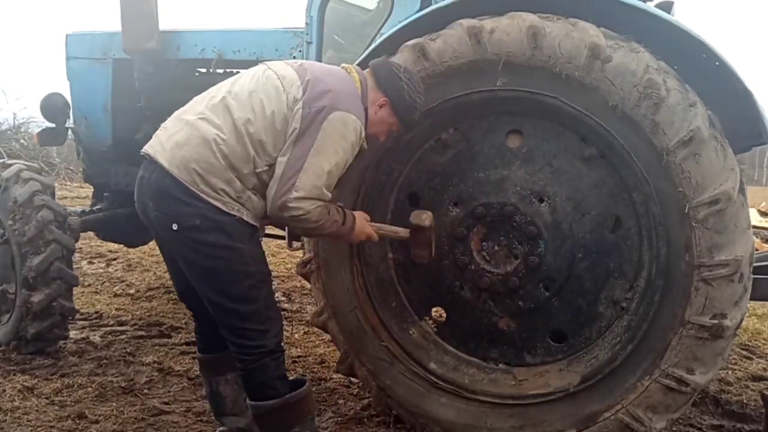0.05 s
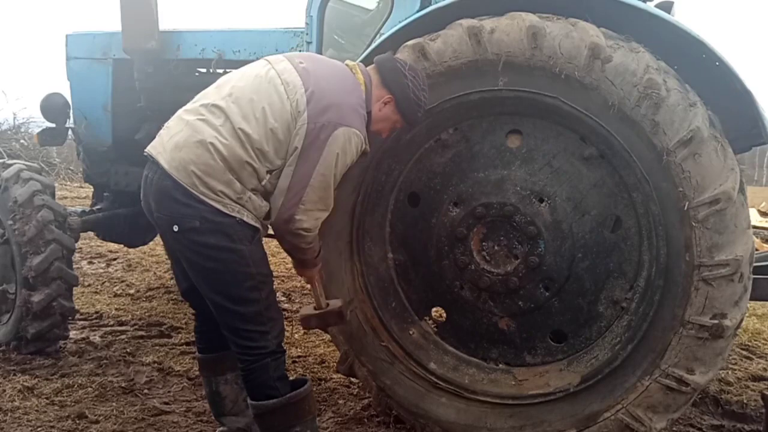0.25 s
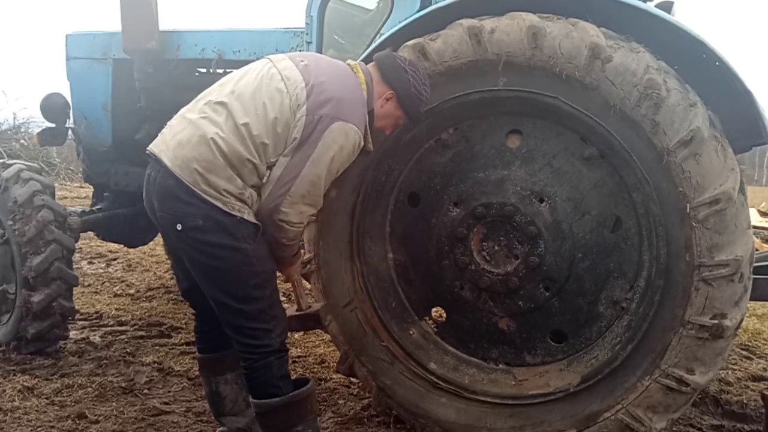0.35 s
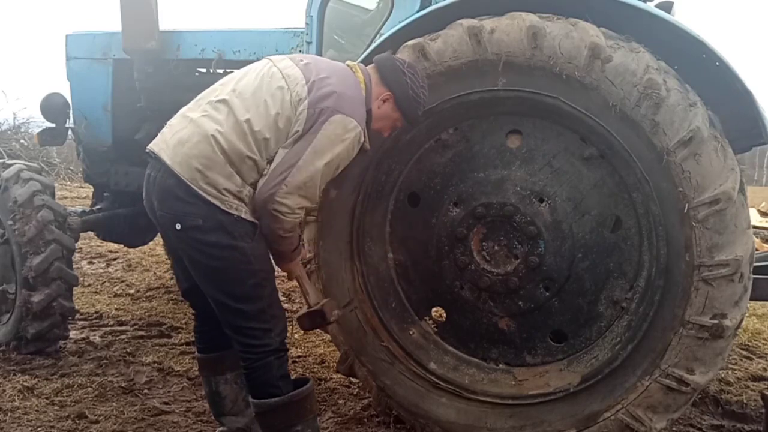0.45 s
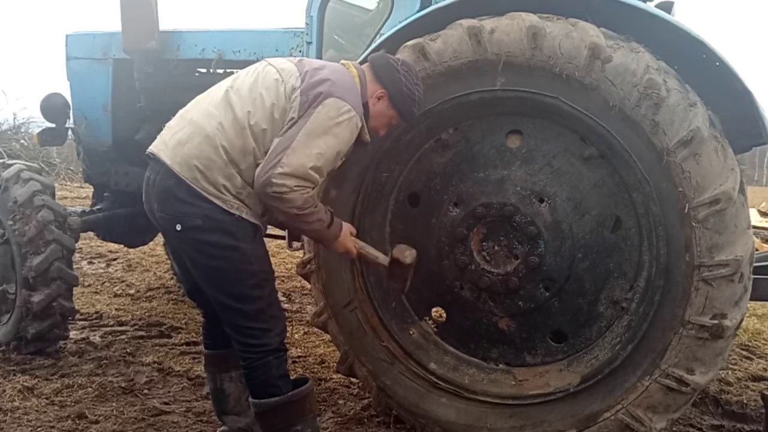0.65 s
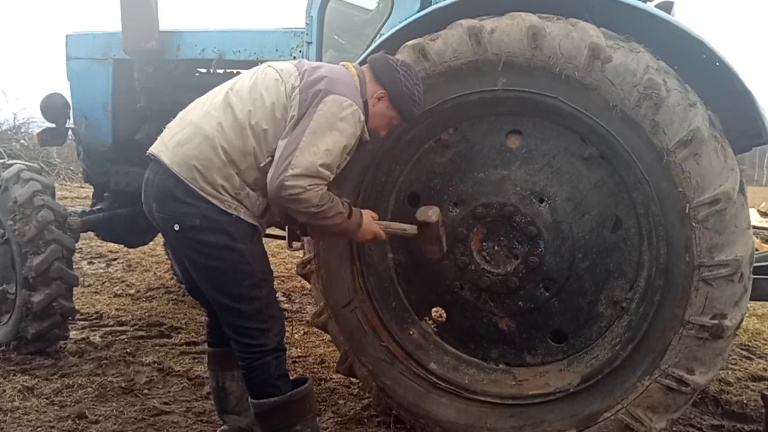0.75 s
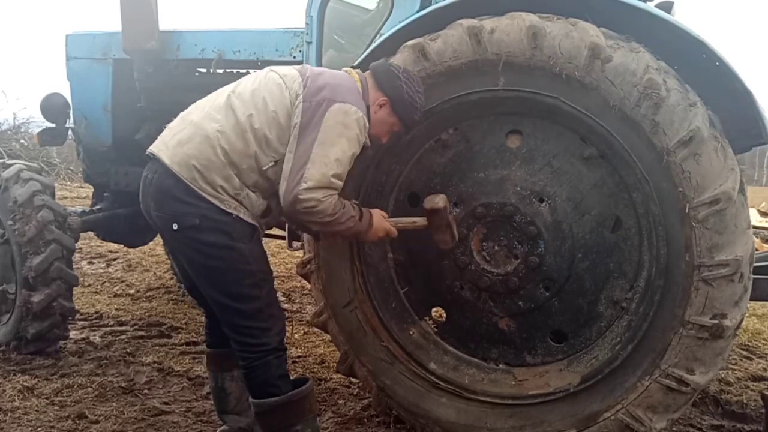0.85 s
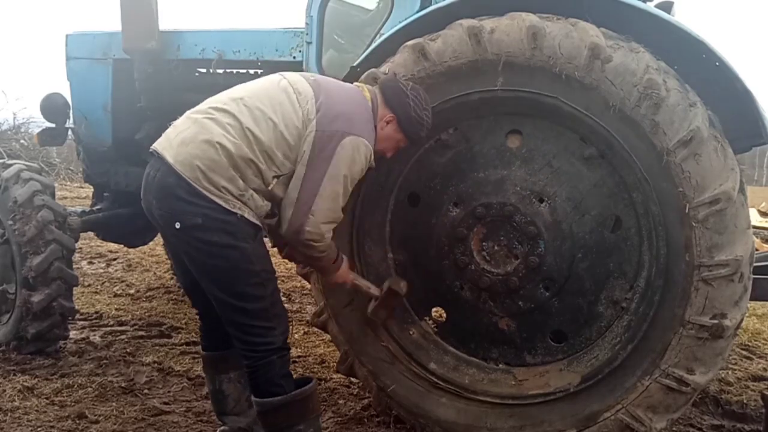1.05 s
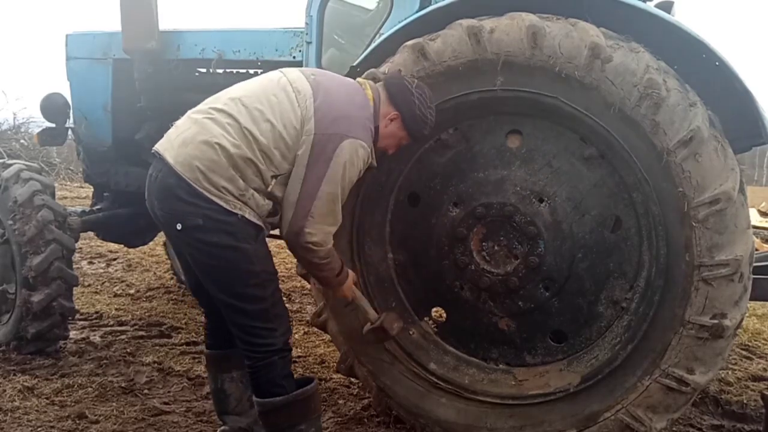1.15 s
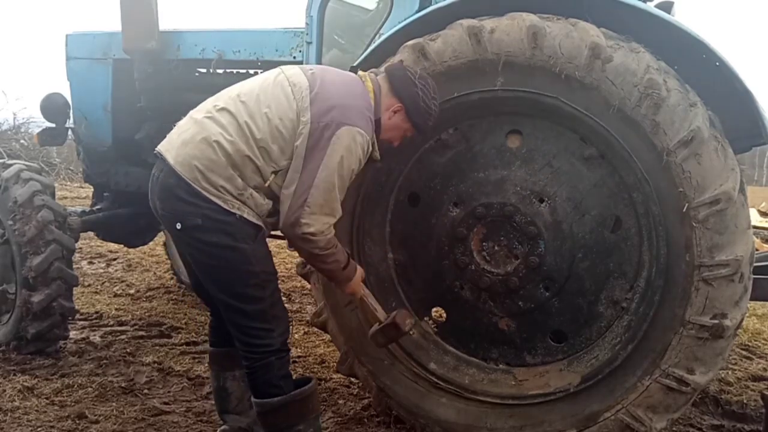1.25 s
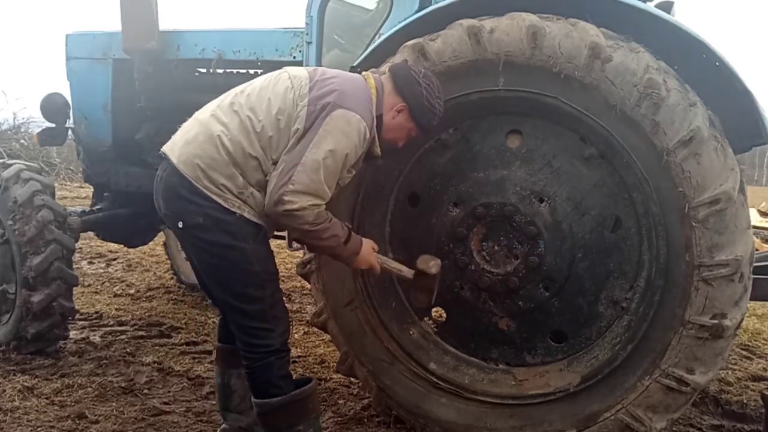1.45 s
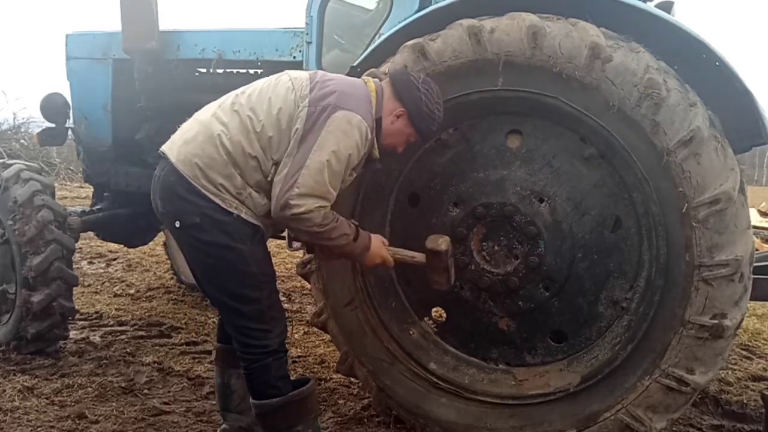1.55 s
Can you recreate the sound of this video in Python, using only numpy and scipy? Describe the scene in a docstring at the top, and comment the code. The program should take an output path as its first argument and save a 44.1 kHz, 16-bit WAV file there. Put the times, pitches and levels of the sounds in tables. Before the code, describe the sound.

Hammer blows on a large tractor wheel, heard close in an open yard. After faint rustle and a tiny tap, a loud, blunt, overloaded rubber thud lands at 0.2 seconds with a little grit. Low wind buffets flutter from about 0.4 to 1.1 seconds over soft cloth and straw rustle. At 1.1 the hammer grazes rubber and cracks on steel, a bright short clang with a thin high ring and scattered echoes fading out.

```python
"""A hammer is swung twice at the edge of a tractor wheel in an open yard: first it lands on the tyre,
then it grazes the tyre and hits the steel rim. Tyre and rim are sums of dying sines, with noise for
grit, crack and wash. The hammer head sings on as a thin sine, and echoes come back from the yard as noise
and a tone. Wind buffets both microphone ports with low noise, short sine pushes and sharp crests.
Clothing and straw rustle with the swing as patchy hiss, and there is one light tap."""
import sys
import numpy as np
from scipy import signal
from scipy.io import wavfile

SR = 44100
rng = np.random.default_rng(int(sys.argv[2]) if len(sys.argv) > 2 else 0)


def attenuation_scalar(level_db):
    """Turn a level in dB into a linear amplitude multiplier (20 dB per decade)."""
    decades = np.asarray(level_db, float) / 20
    return 10 ** decades


def file_out(sig):
    """Save sig as 16-bit WAV at sys.argv[1]."""
    # one column per channel
    cols = np.atleast_2d(sig).T
    # limit, then scale
    lim = np.clip(cols, -1, 1)
    pcm = np.round(lim * 32767).astype(np.int16)
    wavfile.write(sys.argv[1], SR, pcm)


N = 70560
T = np.arange(N) / SR  # time of every sample, s

# In all tables, t60_s is the time to die away by 60 dB and pan_db is left minus right.
# wind at the ports, points of a curve; WIND_DB is added to the level: time_s, level_db, pan_db
WIND_LEVELS = [
    [(0.0, -21.5, 6), (0.036, -39, 12), (0.062, -34, -14.5), (0.102, -31.5, 2), (0.14, -29.5, -4),
     (0.174, -26, 8), (0.206, -26, 5), (0.226, -14.5, -20)],
    [(0.33, -22.5, 0.5), (0.48, -23.5, 10.5), (0.564, -29.5, -23), (0.646, -33, 41), (0.676, -14.5, -15),
     (0.784, -13, 11), (1.036, -25, -6), (1.074, -20.5, 37.5), (1.095, -28, -13)],
    [(1.3, -31.5, -32.5), (1.33, -23.5, 8), (1.372, -20, -3), (1.414, -38.5, 26), (1.464, -46, 10),
     (1.534, -42, -17), (1.548, -26, -4), (1.576, -35, 15.5), (1.6, -38, 21)],
]
# tone colour of the wind noise: pitch_hz, density_db (per Hz)
WIND_SPECTRUM = [(12, -55), (20, -57.5), (54, 6.5), (107, 1), (280, -21.5), (401, -63), (615, -66),
                 (743, -61), (1030, -59), (1200, -72), (1560, -105), (2640, -120)]
# single buffets: start_s, level_db, pitch_hz, pan_db
WIND_BUFFETS = [(0.108, -26, 102, 23.5), (0.39, -9, 144, -11.5), (0.435, -23, 96.9, 26),
                (0.453, -16.5, 102, 32.5), (0.519, -14.5, 100, 12), (0.639, -11, 91.4, -14),
                (0.674, -9.5, 172, -19.5), (0.701, -9, 105, 15), (0.733, -1, 91, 9.5),
                (0.749, -6, 77.4, -11), (0.791, -7, 109, 23), (0.827, -9, 100, 20),
                (0.893, -14, 167, -20.5), (0.943, -7, 98, 11), (1.025, -18, 123, -17),
                (1.058, -5.5, 99, 18), (1.329, -25, 109, -44.5), (1.415, -23.5, 119, 13)]
# sharp crests of the wind: centre_s, level_db, pan_db, width_s
WIND_CRESTS = [(0.438, -26.5, 28, 0.0011), (0.519, -31, -30, 0.0012), (0.68, -23, -30, 0.0021),
               (0.707, -20.5, -17, 0.0014), (0.731, -26.5, 14, 0.00065), (0.7395, -13.5, -11, 0.0014),
               (0.755, -19, 18.5, 0.00085), (0.793, -32, 19, 0.00057), (0.804, -29, 29, 0.00098),
               (0.831, -23, 29, 0.0013), (0.964, -35, -15.5, 0.0011), (1.032, -26.5, -21.5, 0.0014),
               (1.0685, -23, 32.5, 0.0011), (1.421, -36.5, 14.5, 0.00083)]
# rustle, points of a curve; RUSTLE_DB is added: time_s, level_db, top_db and low_db (against the level)
RUSTLE_LEVELS = [
    [(0.02, -63, -10.5, -5.5), (0.086, -68.5, -14, -14), (0.108, -62.5, -12, -4.5), (0.136, -64.5, -9, -6),
     (0.164, -58, -11.5, -8.5), (0.195, -50.5, -18.5, -11)],
    [(0.29, -54, -17, 0), (0.432, -49, -11.5, -13.5), (0.51, -44, -11, -12.5), (0.558, -50, -15, -14.5),
     (0.774, -52, -13.5, -8), (0.924, -65.5, -13, -16), (0.982, -68, -10, -11), (1.09, -61, -12, -5)],
    [(1.4, -63.5, -19, -45), (1.444, -66.5, -42, 3), (1.486, -68.5, -8, -0.5), (1.522, -54.5, -24, -18),
     (1.546, -54, -19, -15), (1.564, -69.5, -14, 4), (1.576, -75, -27, -34.5), (1.585, -68, -3, -4)],
]
# tone colour of rustle and grit: pitch_hz, density_db (per Hz)
RUSTLE_SPECTRUM = [(210, -41), (350, -3.5), (613, -2), (742, -7.5), (1320, -15), (1480, -20), (4900, -22.5),
                   (6230, -20.5), (8310, -33), (14800, -29.5), (16000, -47)]
# one light tap: start_s, level_db, pitch_hz, t60_s
LIGHT_TAP = (0.105, -47, 1100, .1)
# hammer lands on rubber: start_s, level_db, brightness_db (for modes that pull first), grit_db
TYRE_HITS = [(0.2162, 1, -5, -21.5), (1.1063, -11, 11.5, -25)]
# tyre modes, against the level of the hit: pitch_hz, level_db, t60_s, push (plain gain, minus pulls first)
TYRE_MODES = [(69.5, -18.5, 0.83, 0.05), (102, -10.5, 0.34, 0.84), (119.16, -14, 0.4, 0.85),
              (223.4, -21, 0.21, 0.89), (340, -31.5, 0.49, 0.6), (165.2, -0.5, 0.057, 0.85),
              (278, -5.5, 0.071, 0.17), (250, -3, 0.017, -1.1), (534.3, -20, 0.13, -1.09),
              (770, -20, 0.056, -1.1), (1120, -11, 0.023, -1.11), (1511, -19, 0.13, -0.46),
              (2055, -49, 0.053, -0.77)]
# level of the hammer head's ring after each blow, points of a curve: time_s, level_db
HEAD_LEVELS = [
    [(0.23, -46), (0.268, -73), (0.342, -63), (0.372, -84), (0.45, -63)],
    [(1.13, -55), (1.148, -48), (1.198, -40.5), (1.212, -53), (1.224, -48.5), (1.25, -36.5), (1.273, -51.5),
     (1.288, -39.5), (1.345, -46), (1.38, -64), (1.405, -53), (1.437, -64.5), (1.458, -52), (1.508, -61),
     (1.536, -83), (1.568, -60.5), (1.6, -74)],
]
# steel touches steel: start_s, level_db
STEEL_TOUCHES = [(1.1133, -8.5), (1.1165, -10), (1.1924, -27.5)]
# rim modes, against the level of the touch: pitch_hz, level_db, t60_s
RIM_MODES = [(470, -18, .4), (505, -15, .3), (540, -4, .06), (593, -7, .2), (620, -7, .07), (678, -24, .3),
             (1048, -9, .08), (1180, -12, .22), (1450, -20, .2), (1690, -38, .9), (1725, -39, .8),
             (1750, -6, .06), (1805, -17, .2), (2417, -17, .09), (2615, -2, .03), (2955, -3, .03),
             (3930, -16, .06), (4195, 1, .033), (4750, -24, .12), (5320, -26, .13), (5650, -17, .05),
             (6008, 4, .027), (7004, -23, .09), (7397, -12, .033)]
# left port hears the rim modes later: pitch_hz, lag_s
RIM_LAGS = [(500, .00002), (3000, .00006), (4200, .00007), (6000, .00019), (8000, .00016)]
# tone colour of the crack: pitch_hz, density_db (per Hz)
CRACK_SPECTRUM = [(180, -54), (300, 8), (900, -1.5), (1810, 9), (2140, -2), (2610, 0.5), (5340, -5.5),
                  (6100, -3), (6410, 4), (10000, -10.5), (16000, -30)]
# tone colour of the wheel disc's dense ringing: pitch_hz, density_db (per Hz)
WASH_SPECTRUM = [(35, -31), (60, 2), (108, -5.5), (593, -14.5), (842, -25), (1170, -25.5), (1280, -27),
                 (6580, -38), (7400, -47.5), (16000, -63.5)]
# how long the disc rings: pitch_hz, t60_s
WASH_DECAY = [(60, 0.9), (300, 0.57), (1000, 0.46), (4000, 0.54), (16000, 0.052)]
# echoes of the steel blow: start_s, level_db, rise_s, t60_s, top_db (added to the top octave)
YARD_ECHOES = [(1.175, -23, 0.015, 0.17, 10.5), (1.293, -41.5, 0.0087, 0.27, 3),
               (1.387, -49, 0.013, 0.52, 6.5), (1.509, -44, 0.0071, 0.15, 4)]
# tone colour of the echoes: pitch_hz, density_db (per Hz)
ECHO_SPECTRUM = [(240, -53), (400, 5), (852, -11.5), (1840, -1), (6640, -16.5), (6950, -6), (7400, -5),
                 (7750, -44), (16000, -30.5)]
# a rim mode returns: start_s, level_db, pitch_hz, rise_s, t60_s
RIM_ECHO = (1.16, -18.5, 1190, .02, .12)

WIND_DB, LUMP_DB, LUMPS_PER_S, WIND_CUT_HZ = -6, 3.0, 30, 330
# a buffet's t60 lasts BUFFET_CYCLES of its own cycles
BUFFET_CYCLES, BUFFET_CUT_HZ, BUFFET_RISE_S = 4.14, 880, 0.005
RUSTLE_DB, RUSTLE_ALIKE, RUSTLE_PAN_DB, SWELL_DB = 6.5, 0.16, 0.5, 0.7
TOP_HZ, TOP_MEAN_DB, LOW_HZ, LOW_MEAN_DB = 8000, -12, 1500, -3.5
WAVER_DB, WAVER_AFTER_S = 4, 0.05
RUBBER_CUT_HZ, PUSH_LAG_S, BLOW_PAN_DB = 2330, 0.0022, 1.1
GRIT_T60_S, GRIT_RISE_S, GRAIN_DB = 0.11, 0.0033, 5
HEAD_HZ, HEAD_WIDTH_HZ, HEAD_LAG_S = 7170, 4, 0.00016
STEEL_PAN_DB, STEEL_ALIKE = 3, 0.45  # this pan also places the tyre grit
# later touches ring the modes more weakly, by RETOUCH_DB
RIM_DB, RETOUCH_DB, MODE_SPREAD_DB = -1.5, -7, 1.5
# the top octave of the crack also dies with a t60 of its own
CRACK_DB, CRACK_T60_S, CRACK_TOP_T60_S, CRACK_LAG_S = -2, 0.04, 0.037, 0.00006
WASH_DB = -16
MIC_CUT_HZ, CLIP_TOP = 60, 3.1


def rms_one(x):
    """Scale to an rms (average strength) of 1."""
    return x / np.sqrt(np.mean(x ** 2) + 1e-20)


def in_time(spans):
    """Join the stretches of a table and read its columns at every sample."""
    rows = sorted(row for span in spans for row in span)
    time_s, *columns = np.transpose(rows)
    return [np.interp(T, time_s, column) for column in columns]


def at_hz(points, hz):
    """Table value at a pitch, joined by straight lines over log frequency."""
    pitch_hz, value = np.transpose(points)
    return np.interp(np.log(hz), np.log(pitch_hz), value)


def panned(db):
    """Left and right gains that differ by db."""
    return attenuation_scalar(np.array([db / 2, -db / 2]).reshape(2, -1))


def drift(rate):
    """Random wandering of spread 1: noise through two equal low-pass poles at rate Hz."""
    # computed at every 40th sample; the first 2000 values let the filter settle
    r = np.exp(-80 * np.pi * rate / SR)
    noise = rng.standard_normal(N // 40 + 2002)
    slow = signal.lfilter([1], [1, -2 * r, r * r], noise)[2000:]
    return np.interp(np.arange(N) / 40, np.arange(len(slow)), rms_one(slow))


def dying(start, t60, rise):
    """Envelope that rises at start and dies by 60 dB in each t60."""
    t = np.maximum(T - start, 0)
    return (1 - np.exp(-t / max(rise, 1e-4))) * attenuation_scalar(-60 * t / t60)


def mode(start, hz, t60):
    """One way a struck body vibrates: a sine that starts at the blow and dies away."""
    t = np.maximum(T - start, 0)
    return np.sin(2 * np.pi * hz * t) * attenuation_scalar(-60 * t / t60)


def low(x, hz):
    """Second-order low-pass."""
    return signal.sosfilt(signal.butter(2, hz, fs=SR, output="sos"), x)


def bands(spectrum, alike, shape):
    """Stereo noise of rms 1 in half-octave bands, each then put under its own envelope shape(hz)."""
    out, power = 0, 0
    edges = 20 * 2 ** np.arange(0, 10.1, 0.5)
    white = rng.standard_normal((2, 2, N))
    for k, (lo, hi) in enumerate(zip(edges, np.minimum(edges[1:], 19000))):
        hz = np.sqrt(lo * hi)
        if spectrum[0][0] < hz < spectrum[-1][0]:
            band_pass = signal.butter(3, [lo, hi], "band", fs=SR, output="sos")
            # neighbouring bands take separate noise
            mid, side = signal.sosfilt(band_pass, white[k % 2])
            stereo = np.sqrt(1 + alike) * mid + np.sqrt(1 - alike) * side * [[1], [-1]]
            band = attenuation_scalar(at_hz(spectrum, hz)) * stereo
            out = out + band * shape(hz)
            power = power + np.mean(band ** 2)
    return out / np.sqrt(power)


def waver(start):
    """A ringing mode grows unsteady after the blow, in dB."""
    return WAVER_DB * np.clip((T - start) / WAVER_AFTER_S, 0, 1) * drift(25)


def steel_at_ports(x, lag):
    """Steel sounds at the two ports: the left is set louder but hears them lag seconds later."""
    left = np.interp(T - lag, T, x[0])
    return np.array([left, x[1]]) * panned(STEEL_PAN_DB)


def wind():
    """Lumpy low noise, partly alike in the two ports, with dying sine buffets and sharp crests."""
    db, pan_db = in_time(WIND_LEVELS)
    lumps = attenuation_scalar(LUMP_DB * np.array([drift(LUMPS_PER_S), drift(LUMPS_PER_S)]))
    lumpy = rms_one(lumps * bands(WIND_SPECTRUM, 0.41, lambda hz: 1))
    noise = attenuation_scalar(db + WIND_DB) * panned(pan_db) * lumpy
    pushes = 0
    for s, level_db, hz, p_db in WIND_BUFFETS:
        push = dying(s, BUFFET_CYCLES / hz, BUFFET_RISE_S) * np.sin(2 * np.pi * hz * (T - s))
        pushes = pushes + attenuation_scalar(level_db) * panned(p_db) * push
    for s, crest_db, p_db, width in WIND_CRESTS:
        # a peak with a dip on either side
        u = ((T - s) / width) ** 2
        pushes = pushes + attenuation_scalar(crest_db) * panned(p_db) * (1 - u) * np.exp(-u / 2)
    noise = low(low(noise, WIND_CUT_HZ), WIND_CUT_HZ)
    return noise + low(low(pushes, BUFFET_CUT_HZ), BUFFET_CUT_HZ)


def rustle():
    """Soft patchy hiss of cloth and straw, and one light tap of noise through a resonance."""
    db, top_db, low_db = in_time(RUSTLE_LEVELS)
    together = drift(45)

    def patches(hz):
        """Envelope of one band: shared swells and a slower wandering of its own."""
        tilt_db = (hz > TOP_HZ) * (top_db - TOP_MEAN_DB) + (hz < LOW_HZ) * (low_db - LOW_MEAN_DB)
        return attenuation_scalar(db + RUSTLE_DB + tilt_db + SWELL_DB * together + 0.94 * drift(10.0))

    hiss = bands(RUSTLE_SPECTRUM, RUSTLE_ALIKE, patches)
    s, tap_db, hz, t60 = LIGHT_TAP
    resonance = signal.iirpeak(hz, 4.0, fs=SR)
    tap = rms_one(signal.lfilter(*resonance, rng.standard_normal(N))) * dying(s, t60, 0.0011)
    return hiss * panned(RUSTLE_PAN_DB) + attenuation_scalar(tap_db) * low(low(tap, 2000), 2200)


def tyre():
    """Rubber thuds: upper modes pull in first, the low body pushes out just after; dirt shakes loose."""
    thuds, grit_level = 0, 0
    for s, db, bright_db, grit_db in TYRE_HITS:
        for hz, level_db, t60, way in TYRE_MODES:
            gain = way * attenuation_scalar(db + level_db + (way < 0) * bright_db + waver(s))
            thuds = thuds + gain * mode(s + (way > 0) * PUSH_LAG_S, hz, t60)
        grit_level = grit_level + attenuation_scalar(grit_db) * dying(s, GRIT_T60_S, GRIT_RISE_S)
    # fast wandering makes the grit grainy
    grit_level = grit_level * attenuation_scalar(GRAIN_DB * drift(530))
    grit = bands(RUSTLE_SPECTRUM, 0.1, lambda hz: grit_level)
    thuds = low(low(thuds, RUBBER_CUT_HZ), RUBBER_CUT_HZ)
    return thuds * panned(BLOW_PAN_DB) + grit * panned(STEEL_PAN_DB)


def hammer_head():
    """A thin tone after each blow: one sine, wavering in pitch and level."""
    phase = 2 * np.pi * np.cumsum(HEAD_HZ + HEAD_WIDTH_HZ * drift(11)) / SR
    level = 0
    for rows in HEAD_LEVELS:
        time_s, db = np.transpose(rows)
        level = level + attenuation_scalar(np.interp(T, time_s, db, left=-120, right=-120))
    # the level is smoothed; the root of two makes it the rms of the sine
    tone = np.sqrt(2) * low(level, 100) * np.sin(phase)
    return steel_at_ports(tone * np.ones((2, 1)), HEAD_LAG_S)


def rim():
    """Each touch rings the rim modes anew and cracks; the disc washes on, dying from the top."""
    first = STEEL_TOUCHES[0][0]
    ring, burst = 0, 0
    for s, db in STEEL_TOUCHES:
        touch_db = db + RIM_DB + (s > first) * RETOUCH_DB
        chances = rng.standard_normal((len(RIM_MODES), 3))
        for (hz, level_db, t60), (sign, left, right) in zip(RIM_MODES, chances):
            # each port hears every mode a little stronger or weaker
            spread_db = MODE_SPREAD_DB * np.array([[left], [right]])
            gain = np.sign(sign) * attenuation_scalar(touch_db + level_db + spread_db + waver(s))
            lag = at_hz(RIM_LAGS, hz) * np.array([[1], [0]])
            ring = ring + gain * mode(s + lag, hz, t60)
        burst = burst + attenuation_scalar(db + CRACK_DB) * dying(s, CRACK_T60_S, 0.0005)

    def crack_shape(hz):
        """The top octave dies faster."""
        return burst * dying(first, CRACK_TOP_T60_S if hz > TOP_HZ else np.inf, 0)

    crack = bands(CRACK_SPECTRUM, STEEL_ALIKE, crack_shape)
    wash = bands(WASH_SPECTRUM, STEEL_ALIKE, lambda hz: dying(first, at_hz(WASH_DECAY, hz), 0.00062))
    return ring * panned(STEEL_PAN_DB) + steel_at_ports(crack, CRACK_LAG_S) + attenuation_scalar(WASH_DB) * wash


def echoes():
    """Smeared returns of the steel blow: noise that rises and dies, and one returning rim tone."""
    def returns(hz):
        """Envelope of one band over all echoes."""
        return sum(attenuation_scalar(db + (hz > TOP_HZ) * top_db) * dying(s, t60, rise)
                   for s, db, rise, t60, top_db in YARD_ECHOES)

    smear = bands(ECHO_SPECTRUM, 0.17, returns)
    s, db, hz, rise, t60 = RIM_ECHO
    tone = attenuation_scalar(db + waver(s)) * dying(s, t60, rise) * np.sin(2 * np.pi * hz * T)
    return smear + tone


def scene():
    """All sources added together."""
    return tyre() + rim() + hammer_head() + echoes() + wind() + rustle()


def top_cut(x):
    """Nothing passes above the cut-off."""
    return signal.sosfilt(signal.butter(12, 16480, fs=SR, output="sos"), x)


def record(dry):
    """The microphone cuts the deep bass; peaks overload, bending softly and then clipping at full scale."""
    cut = signal.sosfilt(signal.butter(2, MIC_CUT_HZ, "high", fs=SR, output="sos"), dry)
    bent = CLIP_TOP * np.tanh(cut / CLIP_TOP)
    mix = np.clip(bent, -1, 1)
    return top_cut(mix)


dry = scene()
out = record(dry)
file_out(out)
```